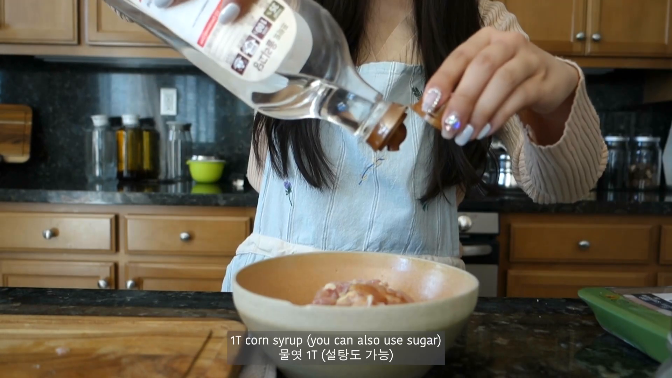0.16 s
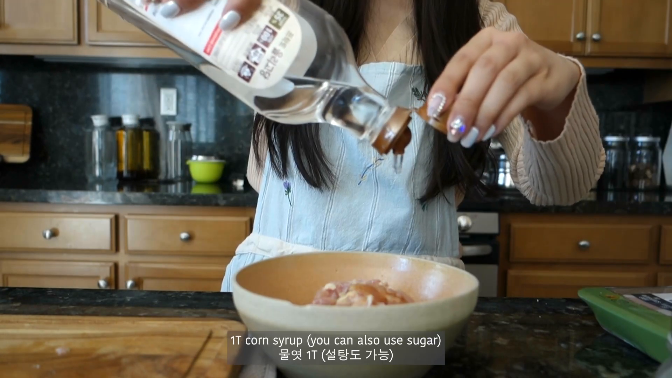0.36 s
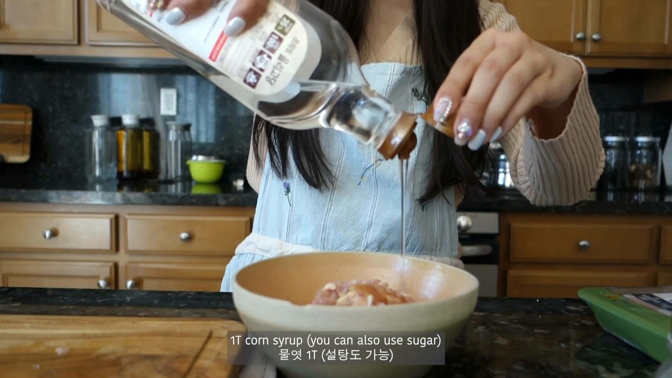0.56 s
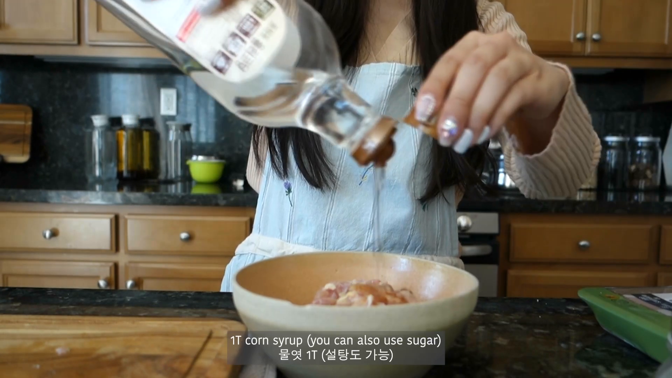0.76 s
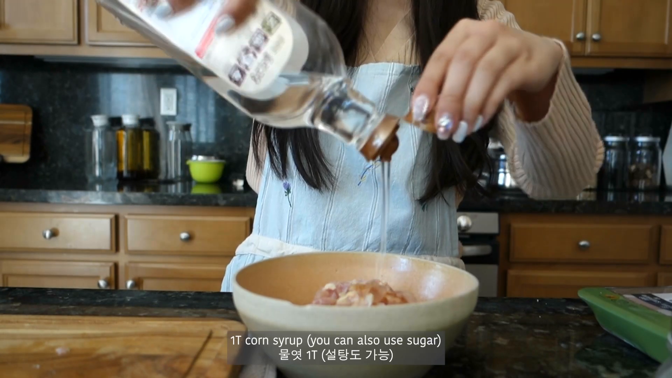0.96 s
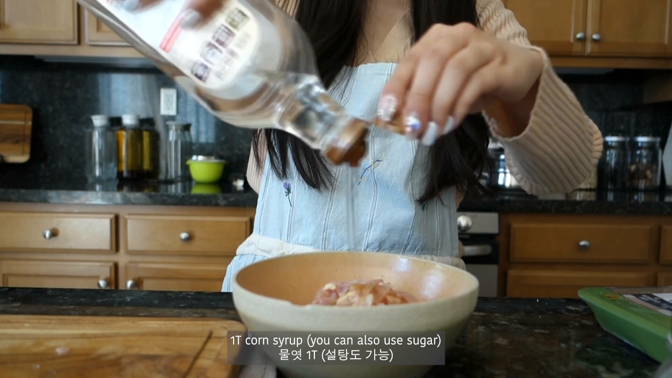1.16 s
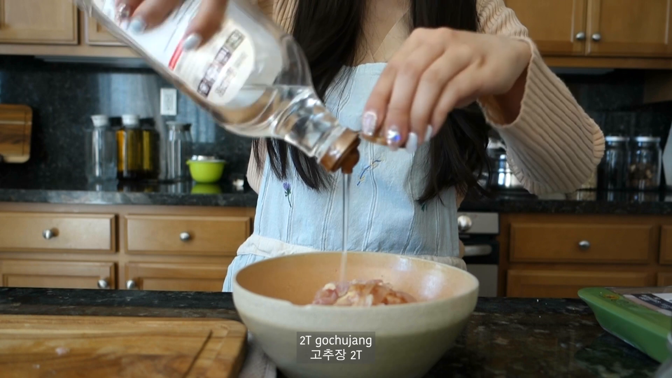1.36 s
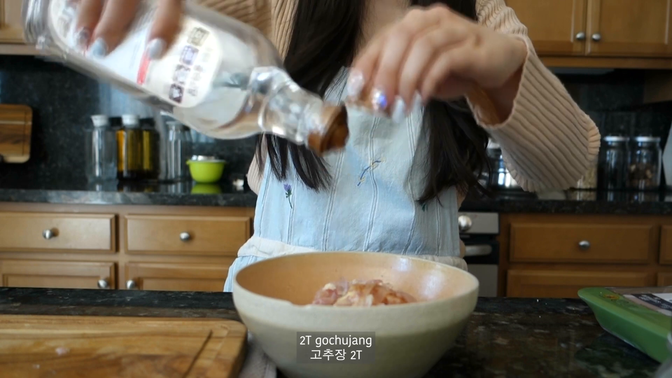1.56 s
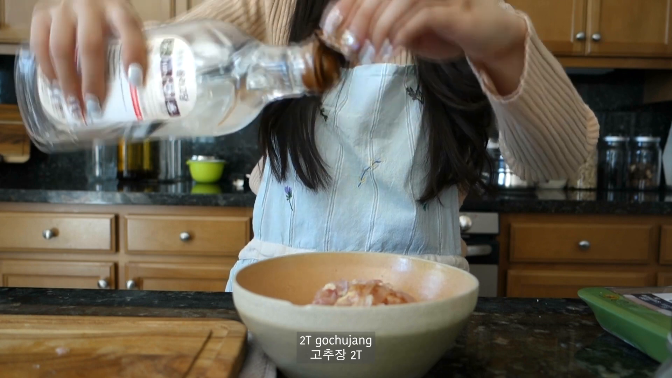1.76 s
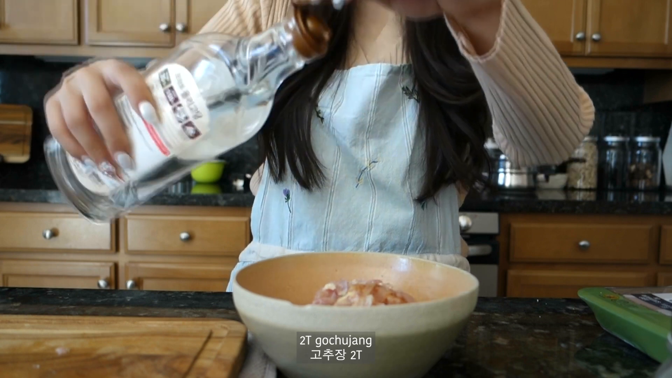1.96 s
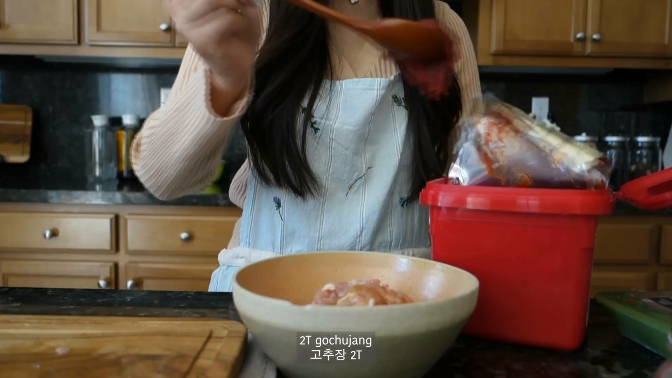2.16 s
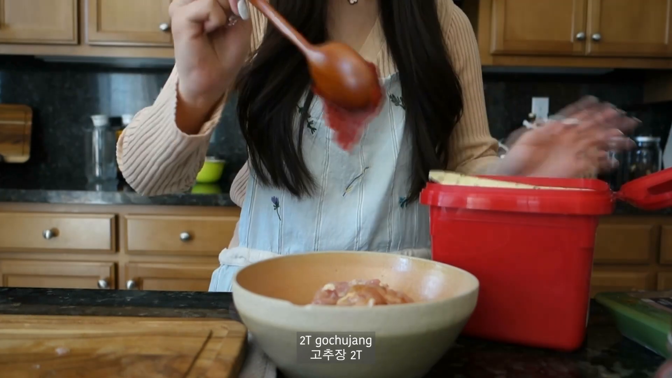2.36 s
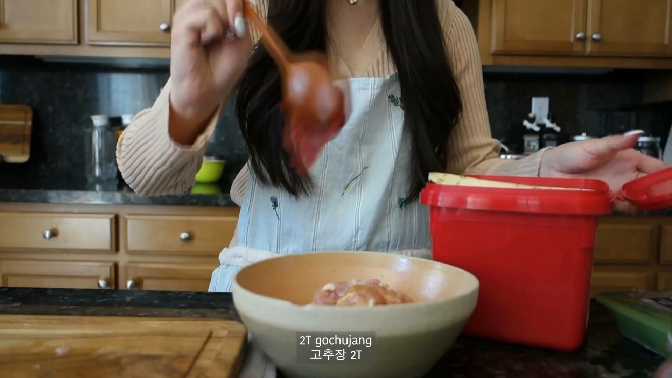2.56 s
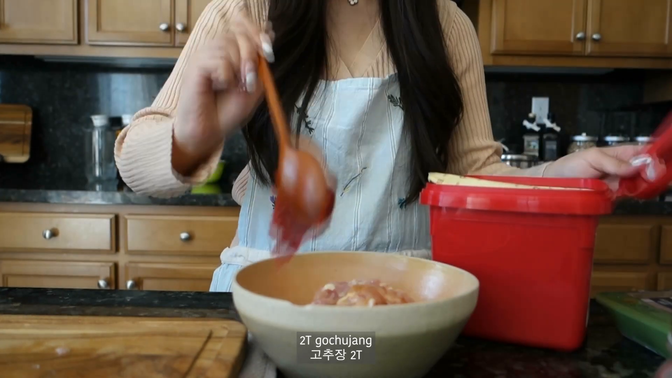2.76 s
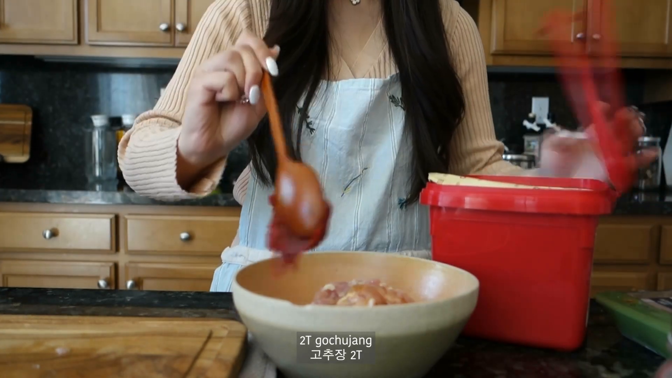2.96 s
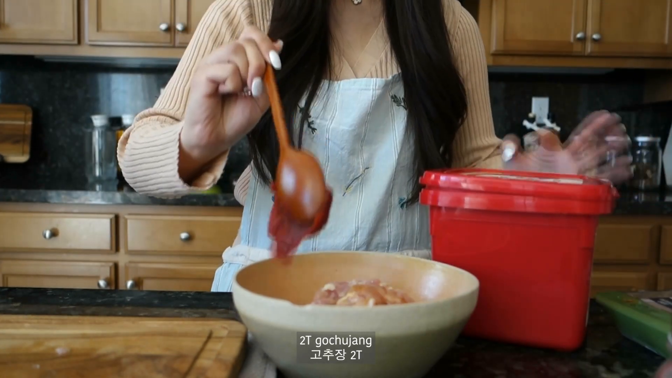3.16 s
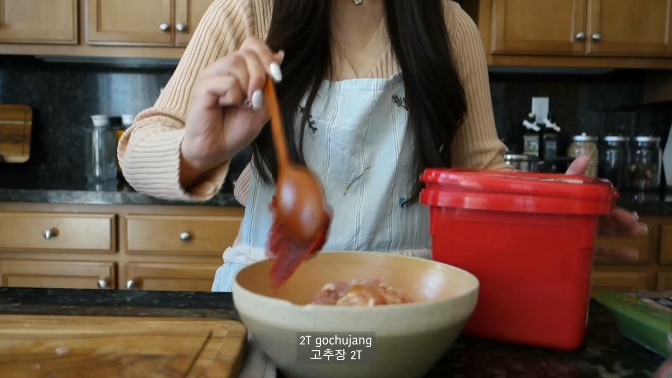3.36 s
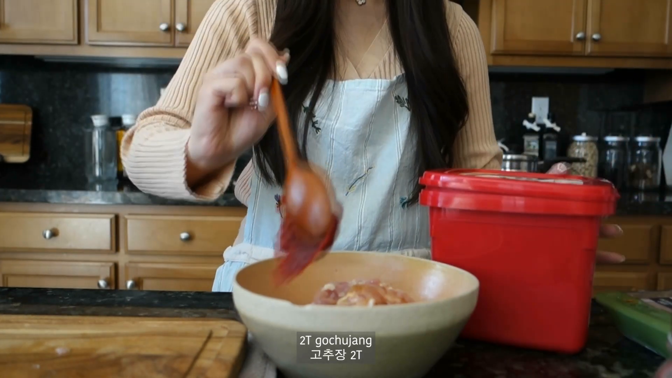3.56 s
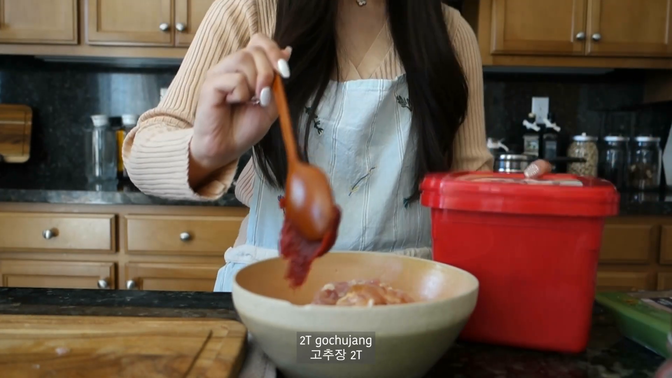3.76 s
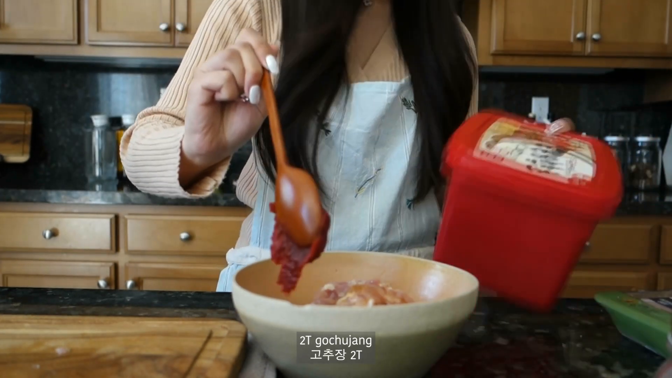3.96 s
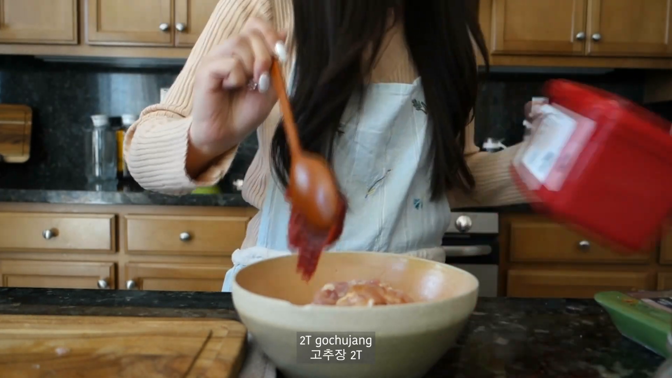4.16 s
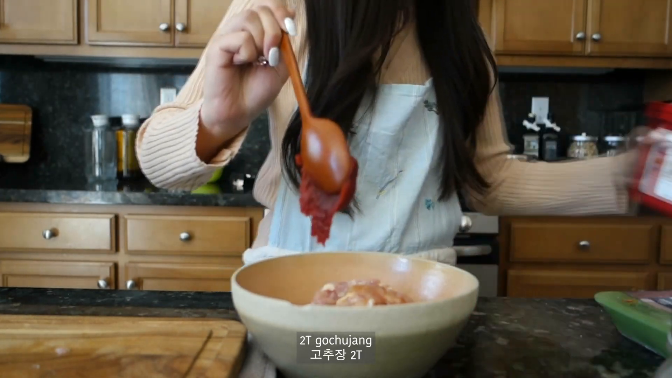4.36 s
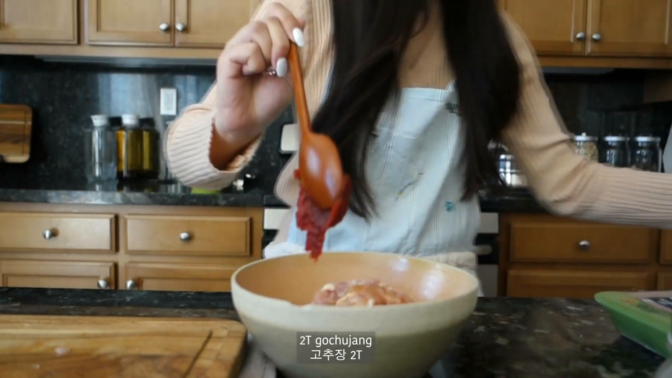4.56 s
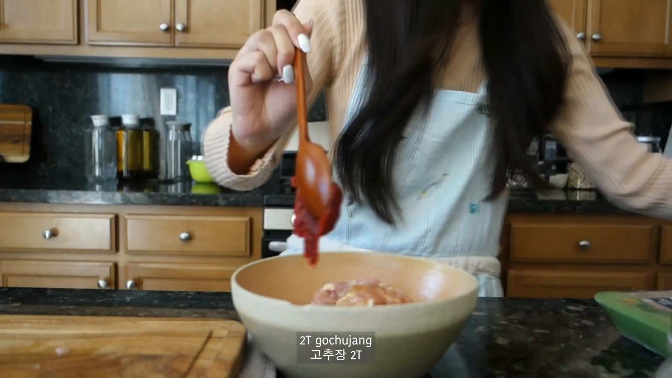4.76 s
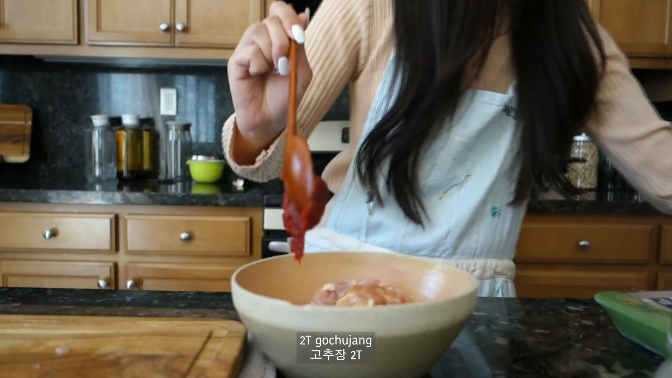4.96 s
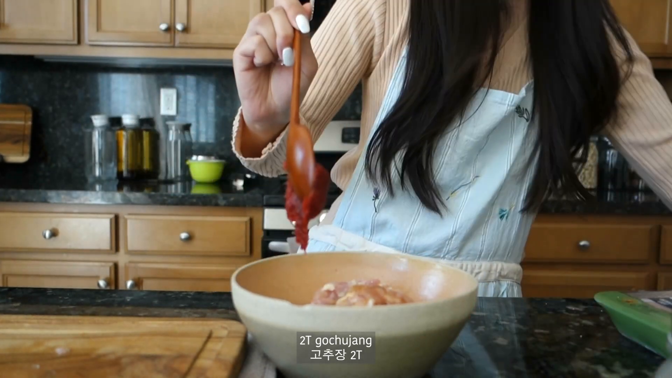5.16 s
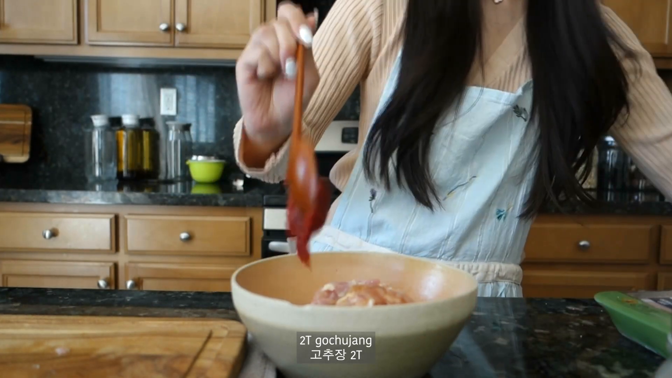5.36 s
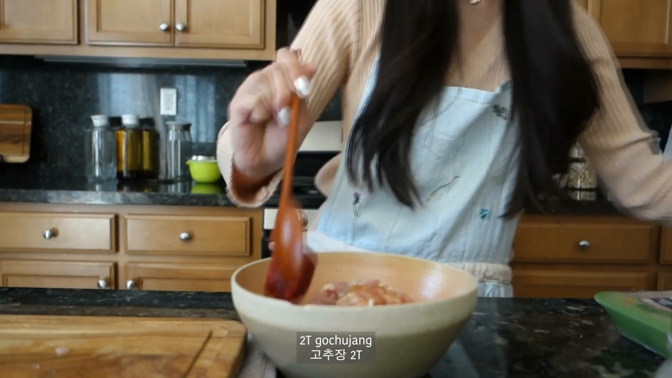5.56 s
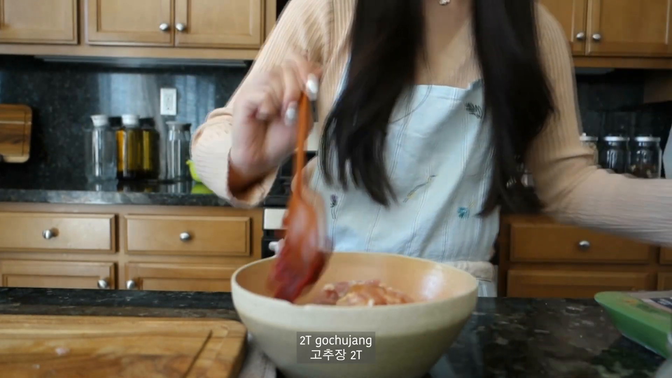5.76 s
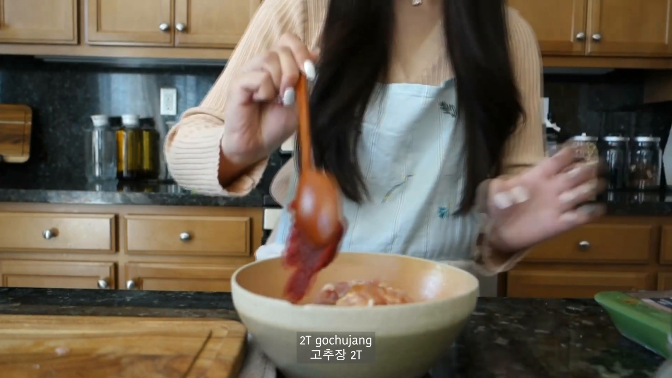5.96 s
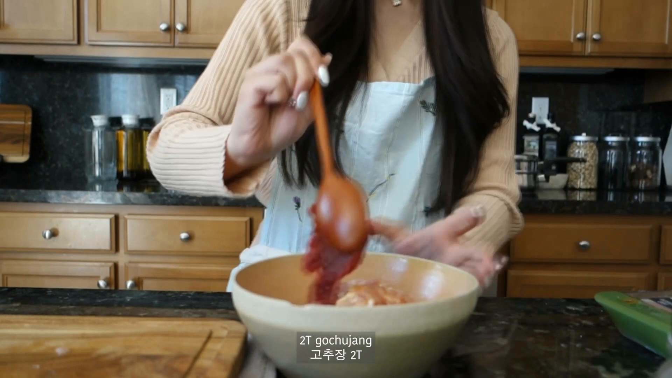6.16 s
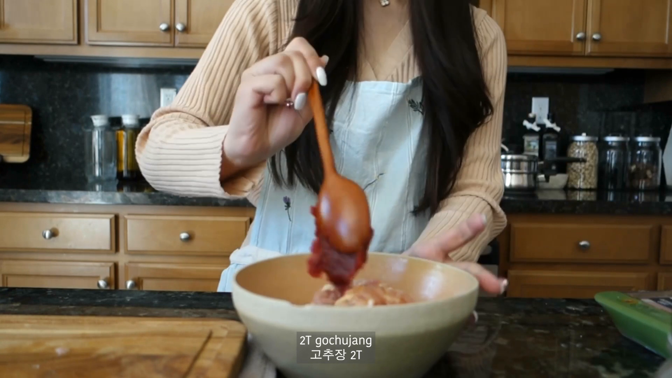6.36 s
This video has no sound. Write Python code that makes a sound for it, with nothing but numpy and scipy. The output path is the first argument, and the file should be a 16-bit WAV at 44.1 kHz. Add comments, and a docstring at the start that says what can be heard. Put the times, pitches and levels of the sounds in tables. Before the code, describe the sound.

Over a low fan hum, a plastic tub lid clicks, squeaks and knocks shut, then the tub bumps and scrapes heavily onto a shelf.

```python
"""A plastic tub handled at a kitchen counter, close to a stereo microphone and a little right of it.
Its lid clicks, chirps, knocks and whistles thinly as it is pressed home: noisy snaps, damped wavelets and
ringing modes. Put away on a shelf, the tub bumps heavily and slides: tiny slips excite rumble and squeal.
Paste lands in soft pats, a metal spoon handle rings faintly and fingers tick on a bottle; the kitchen echoes
the handling, and an appliance fan hums in the room: coloured noise through resonances."""
import sys
import numpy as np
from scipy import signal
from scipy.fft import rfft, irfft, next_fast_len
from scipy.io import wavfile

SR = 44100
rng = np.random.default_rng(int(sys.argv[2]) if len(sys.argv) > 2 else 0)


def unload_wav(signal):
    """Save mono or channel-first audio to the path in sys.argv[1] as 16-bit WAV at rate SR, clipped to [-1, 1]."""
    wavfile.write(
        sys.argv[1],
        SR,
        np.round(np.clip(np.atleast_2d(signal).T, -1, 1) * 32767).astype(np.int16),
    )


N = 282681
TIME = np.arange(N) / SR
BLOW_TIME = np.arange(SR // 4) / SR  # time axis of one short sound, s


def from_db(db):
    """Decibels to gain."""
    return 10 ** (np.asarray(db) / 20)


def rms_one(x):
    """Scale to unit rms."""
    return x / np.sqrt(np.mean(x ** 2) + 1e-20)


def at_hz(points, hz):
    """Read a table on a log-frequency axis."""
    table = np.array(points)
    return np.interp(np.log(hz + 1e-6), np.log(table[:, 0]), table[:, 1])


def in_time(rows):
    """Columns of a curve at every sample."""
    seconds, *columns = np.transpose(rows)
    return [np.interp(TIME, seconds, column) for column in columns]


def during(rows):
    """True between the first and the last point of a curve."""
    return (TIME > rows[0][0]) & (TIME < rows[-1][0])


def add(track, start, sound):
    """Lay a sound into a track at a time in seconds."""
    i = max(round(start * SR), 0)
    track[..., i:i + sound.shape[-1]] += sound[..., :N - i]


def band(x, low, high):
    """Causal band-pass."""
    sos = signal.butter(2, [low, high], "band", fs=SR, output="sos")
    return signal.sosfilt(sos, x + 1e-18)


def resonate(x, modes):
    """Parallel resonances of (Hz, width in Hz, dB), with alternating signs."""
    out = 0
    for k, (hz, width, db) in enumerate(modes):
        r = np.exp(-np.pi * width / SR)  # the wider the resonance, the faster it decays
        poles = [1, -2 * r * np.cos(2 * np.pi * hz / SR), r * r]
        gain = (-1) ** k * from_db(db) * (1 - r * r) / 2
        out = out + gain * signal.lfilter([1, 0, -1], poles, x + 1e-18)
    return out


def wavelet(hz, swell):
    """A heavily damped flexing: its envelope swells to 1 in swell seconds, then dies away."""
    envelope = (BLOW_TIME / swell * np.exp(1 - BLOW_TIME / swell)) ** 2
    return envelope * np.sin(2 * np.pi * hz * BLOW_TIME)


def at_level(x, db):
    """Give a short sound the energy of 12 ms at that level."""
    energy = np.sum(x ** 2, axis=-1, keepdims=True)
    return x * from_db(db) * np.sqrt(.012 * SR / (energy + 1e-20))


def lean(x, balance):
    """Tilt a sound between left and right, frequency by frequency."""
    size = next_fast_len(x.shape[-1] + 2048)
    db = at_hz(balance, np.fft.rfftfreq(size, 1 / SR))
    gains = from_db(np.array([db, -db]) / 2)
    return irfft(rfft(x, size) * gains, size)[:, :x.shape[-1]]


def left_late(x, count):
    """Sound from the right reaches the left microphone a few samples later."""
    return np.array([np.roll(x[0], count), x[1]])


def stereo_noise(spectrum, likeness, size):
    """Two channels of coloured noise, as alike at each frequency as the likeness table says."""
    padded = next_fast_len(size)
    hz = np.fft.rfftfreq(padded, 1 / SR)
    mid, side = rfft(rng.standard_normal((2, padded)))
    alike = np.clip(at_hz(likeness, hz), -1, 1)
    both = np.sqrt((1 + alike) / 2) * mid + np.sqrt((1 - alike) / 2) * side * [[1], [-1]]
    return irfft(both * from_db(at_hz(spectrum, hz)), padded)[:, :size]


# Colour of the room's rush. Each row: frequency in Hz, relative level per Hz in dB.
RUSH_SPECTRUM = [(20, -6), (50, -8.5), (72, -2), (140, -1.5), (260, -4), (420, -7.5), (550, -12),
                 (1000, -11.5), (1450, -18), (1900, -19.5), (2300, -23.5), (4000, -28), (12000, -30),
                 (14800, -28), (15700, -24.5)]
# Resonances of the fan. Each row: frequency in Hz, width in Hz, relative level in dB.
FAN_MODES = [(159, 2.8, 8), (275, 24, -20), (667, 74, -1), (805, 29, -4.5), (977, 33, -8.5), (1239, 88, -2),
             (1799, 69, -2.5)]
# How alike left and right hear the room. Each row: frequency in Hz, likeness from 0 to 1.
ROOM_TONE_LIKENESS = [(60, 0.98), (130, 0.96), (290, 0.79), (640, 0.56), (1410, 0.8), (3100, 0.033),
                      (15000, 0.058)]
# Balance of the room tone. Each row: frequency in Hz, left minus right in dB.
ROOM_TONE_BALANCE = [(200, 0), (1300, -2), (2400, -0.5), (4400, -4), (15000, -5)]
RUSH_DB, FAN_DB = -57, -63  # rms before the tilt between left and right


def room_tone():
    """A fan's dull rush and resonances over faint hiss; it reaches the left microphone a little sooner."""
    rush = rms_one(stereo_noise(RUSH_SPECTRUM, ROOM_TONE_LIKENESS, size=N))
    white = stereo_noise([(1, 0)], ROOM_TONE_LIKENESS, size=N)
    fan = rms_one(band(resonate(white, FAN_MODES), 80, 1670))
    left, right = lean(from_db(RUSH_DB) * rush + from_db(FAN_DB) * fan, ROOM_TONE_BALANCE)
    return np.array([left, np.roll(right, 4)])


# How long the kitchen rings. Each row: frequency in Hz, time to fall 60 dB in seconds.
ECHO_T60 = [(100, 1.9), (260, 0.54), (700, .5), (1840, 0.64), (4850, 0.45), (12800, 0.47)]
# Strength of the echoes. Each row: frequency in Hz, reverberant level against direct in dB.
ECHO_SPECTRUM = [(80, -12), (200, -5.5), (400, -6.5), (800, -4), (2000, -5.5), (4500, -2.5), (9000, -8.5),
                 (15000, -4.5)]
# How alike the echoes are left and right. Each row: frequency in Hz, likeness from 0 to 1.
ECHO_LIKENESS = [(100, 1), (300, 0.96), (600, 0.91), (1200, 0.75), (2400, 0.55), (4500, 0.033),
                 (15000, 0.13)]


def kitchen(x, first_echo_s=0.0056, build_s=0.00067):
    """Dense echoes off tiles and cupboards build up, then die away, lingering longest in the bass."""
    t = np.arange(SR * 3 // 4) / SR
    hz = np.fft.rfftfreq(len(t), 1 / SR)
    noise = rfft(stereo_noise(ECHO_SPECTRUM, ECHO_LIKENESS, size=len(t)))
    swell = 1 - np.exp(-np.maximum(t - first_echo_s, 0) / build_s)
    echoes = 0
    for centre, t60 in ECHO_T60:
        # overlapping bands, each fading at its own pace
        share = at_hz([(f, float(f == centre)) for f, _ in ECHO_T60], hz)
        fade = swell * from_db(-60 * t / t60)
        echoes = echoes + irfft(noise * share, len(t)) * fade / np.sqrt(np.sum(fade ** 2))
    return signal.fftconvolve(x[None], echoes, axes=1)[:, :N]


# Tiny ticks of the fingers. Each row: start in seconds, level in dB.
BOTTLE_TICKS = [(1.424, -69), (1.529, -77)]


def bottle(tick_t60=.03):
    """Fingers tick faintly on a bottle: short decaying bursts of bright noise."""
    out = np.zeros(N)
    for start, db in BOTTLE_TICKS:
        burst = rng.standard_normal(len(BLOW_TIME)) * from_db(-60 * BLOW_TIME / tick_t60)
        add(out, start, at_level(band(burst, 1800, 14000), db))
    return out


# paste is worked off the spoon in small uneven pats: seconds, seconds, dB, Hz
PASTE_START_S, PASTE_GAP_S, PASTE_DB, PASTE_HZ = 6.115, .034, -44.5, 159


def paste_pats(count=5):
    """Pats at uneven times, strengths and pitches: (s, dB, Hz)."""
    pats = []
    for k, (late, harder, higher) in enumerate(rng.standard_normal((count, 3))):
        start = PASTE_START_S + PASTE_GAP_S * (k + 0.191 * late)
        pats.append((start, PASTE_DB + harder, PASTE_HZ * 2 ** (0.18 * higher)))
    return pats


# Soft pats of paste and hands. Each row: start in seconds, level in dB, pitch in Hz.
DABS = [(.1, -49, 210), (2.641, -46, 345), (3.009, -45.5, 125), (6.016, -40.5, 270)]
# The faint ring of a metal spoon handle. Each row: frequency in Hz, level in dB.
HANDLE_MODES = [(2789, -68), (5943, -83), (7698, -71), (11838, -79)]
HANDLE_S, HANDLE_WIDTH_S = 6.298, 0.022  # middle and spread of the swell


def spoon(dab_cycles=1.2):
    """Paste lands with soft damped pats; a metal spoon handle rings faintly in a brief swell of pure tones."""
    out = np.zeros(N)
    for start, db, hz in DABS + paste_pats():
        add(out, start, from_db(db) * wavelet(hz, dab_cycles / hz))
    swell = np.exp(-.5 * ((TIME - HANDLE_S) / HANDLE_WIDTH_S) ** 2)
    tones = sum(from_db(db) * np.sin(2 * np.pi * hz * TIME) for hz, db in HANDLE_MODES)
    return out + swell * tones


# Short shoves of the tub. Each row: start in seconds, length in seconds, rumble in dB, squeal in dB.
SHOVES = [(5.021, 0.038, -31, -36), (5.112, 0.093, -33, -39.5), (5.267, 0.04, -28, -54),
          (5.334, 0.016, -33.5, -38)]
# The shelf under the slide. Each row: frequency in Hz, width in Hz, relative level in dB.
RUMBLE_MODES = [(68, 16, -12), (123, 24, 0.5), (230, 38, 2), (290, 58, 2.5), (440, 154, -1)]
# The squealing contact. Each row: frequency in Hz, width in Hz, relative level in dB.
SQUEAL_MODES = [(780, 400, -6), (846, 32, 2), (1058, 18, 7.5), (1133, 35, 3), (1290, 66, 1.5),
                (1458, 30, 6.5), (1580, 170, -14), (2040, 170, -9.5), (2540, 140, -12.5)]
# each shove breaks away with a louder squeal that soon settles, then dies out
SHOVE_ATTACK_S, RUMBLE_RELEASE_DB_PER_S, SQUEAL_RELEASE_DB_PER_S = 0.0017, 200, 157
BREAKAWAY_DB, BREAKAWAY_S = 6.5, 0.017


def slide(slips_per_s=450):
    """The tub is pushed along: tiny random slips make the shelf rumble and the contact squeal."""
    rumbling, squealing = 0, 0
    for start, length, rumble_db, squeal_db in SHOVES:
        age = np.maximum(TIME - start, 0)
        after = np.maximum(TIME - start - length, 0)
        push = 1 - np.exp(-age / SHOVE_ATTACK_S)
        rumble_now_db = rumble_db - RUMBLE_RELEASE_DB_PER_S * after
        breakaway_db = BREAKAWAY_DB * np.exp(-age / BREAKAWAY_S)
        squeal_now_db = squeal_db + breakaway_db - SQUEAL_RELEASE_DB_PER_S * after
        rumbling = np.maximum(rumbling, push * from_db(rumble_now_db))
        squealing = np.maximum(squealing, push * from_db(squeal_now_db))
    slips = (rng.random(N) < slips_per_s / SR) * rng.standard_normal(N)
    rumble = rms_one(band(resonate(slips, RUMBLE_MODES), 56, 580))
    squeal = rms_one(band(resonate(slips, SQUEAL_MODES), 400, 2530))
    return rumbling * rumble + squealing * squeal


def contact(start, thump_db, knock_db, knock_hz, snap_db, brightness_db, rattle_t60, crack_db=0):
    """One contact; brightness tilts its snap from the clack through the crack to the tick."""
    clack_db, tick_db = snap_db - brightness_db, snap_db + brightness_db
    return start, thump_db, knock_db, knock_hz, clack_db, snap_db + crack_db, tick_db, rattle_t60


WALL_Q, WALL_DB = 17, -1.5  # local wall resonances: sharpness, and dB against the broad colour


def touch_snap(colour, levels_db, rattle_t60, snap_t60, rattle_db, grain_db):
    """Grainy noise and a plain click excite the touched wall: row 0 for the microphone, row 1 the room."""
    size = len(BLOW_TIME)
    noise = rng.standard_normal(size)
    grain = np.repeat(rng.standard_normal(size), 16)[:size]  # roughness held for 16 samples
    decay = from_db(-60 * BLOW_TIME / snap_t60) + from_db(rattle_db - 60 * BLOW_TIME / rattle_t60)
    force = noise * from_db(grain_db * grain) * decay
    # where it is touched the wall has a few sharper resonances of its own
    local_hz = np.geomspace(620, 2900, 7) * 2 ** rng.uniform(-.2, .2, 7)
    local_db = at_hz([(hz, db) for hz, width, db in colour], local_hz) + WALL_DB
    local = zip(local_hz, local_hz / WALL_Q, local_db)
    # summed over all directions the snap's spectrum is smooth, so the room hears a plain click
    touch = np.array([force, BLOW_TIME == 0])
    bright = resonate(touch, colour) + resonate(touch, local)
    clack_db, crack_db, tick_db = levels_db
    clack = at_level(band(bright, 550, 1600), clack_db)
    crack = at_level(band(bright, 1600, 4000), crack_db)
    tick = at_level(band(bright, 4000, 17000), tick_db)
    return clack - crack + tick  # neighbouring bands meet in opposite phase, hence the minus


def ring(blows, modes, ring_db):
    """The body rings on: each mode is a decaying sine started by its own blows."""
    out = 0
    for k, (hz, db, t60) in enumerate(modes):
        r, w = from_db(-60 / (t60 * SR)), 2 * np.pi * hz / SR
        poles = [1, -2 * r * np.cos(w), r * r]
        sine = signal.lfilter([0, np.sin(w)], poles, blows[k] + 1e-18)
        out = out + (-1) ** k * from_db(db + ring_db) * sine
    return out


def contacts(hits, modes, colour, thump_hz, thump_swell, knock_cycles, snap_t60, rattle_db, grain_db,
             ring_db, bright_db, spread_db, focus_db):
    """Each hit snaps and rattles, knocks the wall, thumps the support and leaves the body ringing.
    Returns what goes straight to the microphone and what spreads into the room."""
    out, blows = np.zeros((2, N)), np.zeros((len(modes), N))
    mode_hz = np.array(modes)[:, :1]
    for start, thump_db, knock_db, knock_hz, clack_db, crack_db, tick_db, rattle_t60 in hits:
        levels_db = clack_db, crack_db, tick_db
        snap = touch_snap(colour, levels_db, rattle_t60, snap_t60, rattle_db, grain_db)
        add(out, start, from_db([[bright_db], [spread_db]]) * snap)
        add(out, start, at_level(wavelet(knock_hz, knock_cycles / knock_hz), knock_db))
        add(out, start, at_level(wavelet(thump_hz, thump_swell), thump_db))
        # a blow wakes mostly the modes near its own pitch: focus_db less for each octave away
        for db, hz in ((knock_db, knock_hz), (thump_db, thump_hz)):
            octaves_away = np.abs(np.log2(mode_hz / hz))
            add(blows, start, from_db(db - focus_db * octaves_away))
    return out + ring(blows, modes, ring_db)


# The tub bumps on the shelf. Each row: start in seconds, knock in dB, knock pitch in Hz, thump in dB,
# snap in dB before the shelf's bright_db or spread_db, brightness in dB per band.
SHELF_BUMPS = [(4.441, -51, 694, -77, -76, -3), (4.7667, -31, 230, -38.5, -67, -19),
               (4.9346, -22.5, 250, -27.5, -55, -17), (5.0253, -19, 382, -46, -37, -7),
               (5.157, -34, 283, -36.5, -59, 4), (5.22, -21, 292, -30, -43.5, -9.5),
               (5.2677, -20.5, 308, -29.5, -34, -13), (5.281, -30.5, 290, -32, -40.5, -3),
               (5.318, -23.5, 217, -50, -67, 0), (5.356, -33.5, 306, -60, -54, -4),
               (5.4, -36.5, 230, -60, -59, 2.5), (5.493, -70, 480, -63, -56, 4)]
SHELF_RATTLE_T60_S = 0.087


def shelf_bumps():
    """Each heavy bump of the tub on the shelf, quick rebounds included, is its own row."""
    return [contact(start, thump_db, knock_db, hz, snap_db, brightness_db, SHELF_RATTLE_T60_S)
            for start, knock_db, hz, thump_db, snap_db, brightness_db in SHELF_BUMPS]


# What the shelf rings with. Each row: frequency in Hz, relative level in dB, time to fall 60 dB in seconds.
SHELF_MODES = [(69.7, -11, 0.84), (120.2, -19, 0.35), (125, -10, 0.17), (206.3, -4, 0.15),
               (267.7, -12.5, 0.57), (331.4, -11, 0.38), (366.8, -11, 0.34), (421, -13, 0.22),
               (507.6, -16.5, 0.36), (604, -6, 0.025)]
# Colour of the shelf's snaps. Each row: frequency in Hz, width in Hz, relative level in dB.
SHELF_COLOUR = [(550, 200, 12), (843, 286, 11.5), (960, 160, 13), (1480, 110, 5.5), (1900, 1100, -1),
                (2900, 900, -13), (4840, 5000, -32), (11000, 22000, -6.5)]


def shelf():
    """Heavy, dull bumps of the tub on a shelf: slow thumps, knocks, snaps and ringing low modes."""
    return contacts(shelf_bumps(), SHELF_MODES, SHELF_COLOUR, thump_hz=124.6, thump_swell=0.023,
                    knock_cycles=0.68, snap_t60=0.012, rattle_db=14, grain_db=7.0, ring_db=3.5,
                    bright_db=-8.5, spread_db=1.5, focus_db=8.5)


# Air past the lid as it is pressed. Each row: time in seconds, lower tone in Hz, upper tone in Hz,
# level of the lower tone in dB; the pitches waver around these values.
WHISTLE = [(3.26, 10950, 12500, -80), (3.29, 11400, 13000, -75), (3.34, 11700, 13400, -73),
           (3.37, 11200, 12450, -62), (3.4, 11480, 12500, -75.5), (3.45, 11250, 12800, -70),
           (3.5, 11400, 13150, -64), (3.54, 10950, 12700, -71)]


def whistle(waver_hz=110, upper_db=-3):
    """Air whistles thinly past the lid: two gliding tones share one random waver in pitch."""
    lower_hz, upper_hz, db = in_time(WHISTLE)
    slow = signal.butter(2, 150, fs=SR, output="sos")
    waver = rms_one(signal.sosfilt(slow, rng.standard_normal(N)))
    pitches = np.array([lower_hz, upper_hz]) + waver_hz * waver
    lower, upper = np.sin(2 * np.pi * np.cumsum(pitches, axis=1) / SR)
    return during(WHISTLE) * from_db(db) * (lower + from_db(upper_db) * upper)


# Short squeaks of the lid's rim. Each row: start in seconds, level in dB, pitch in Hz, swell in seconds.
SQUEAKS = [(2.2005, -15, 2620, 0.00063), (2.2029, -18.5, 2060, 0.00047), (2.2093, -30, 2000, 0.0008),
           (3.1435, -17, 2180, 0.0011), (3.838, -23.5, 2200, 0.00055)]


def squeaks():
    """The lid's rim slips and chirps for a few milliseconds."""
    out = np.zeros(N)
    for start, db, hz, swell in SQUEAKS:
        add(out, start, from_db(db) * wavelet(hz, swell))
    return out


# The lid's rim catches and lets go. Each row: start in seconds, snap in dB before the tub's bright_db or
# spread_db, brightness in dB per band, time for the rattle to fall 60 dB in seconds.
RIM_CLICKS = [(2.1053, -41, -6.5, 0.04), (2.1193, -39.5, 3, 0.0068), (2.1275, -45.5, 6, 0.011),
              (2.1547, -43.5, 0, 0.037), (2.1773, -40.5, -2.5, .02), (2.186, -42.5, -7.5, 0.23),
              (2.2527, -49, 0.5, 0.018), (2.274, -43, 6, 0.02), (2.298, -45.5, 10.5, 0.13),
              (2.7732, -56, 3, 0.017), (3.661, -60.5, -3.5, 0.18), (3.7445, -52, -8.5, 0.045),
              (3.836, -39.5, 0.5, 0.029)]
# every click rebounds once, and shakes the wall and the counter a little (dB against the snap)
REBOUND_S, REBOUND_LOSS_DB = 0.0054, 8.5
CLICK_KNOCK_DB, CLICK_KNOCK_HZ, CLICK_THUMP_DB = -5, 564, -9.5
CLICK_CRACK_DB = 4  # the stiff rim favours the crack


def rim_clicks():
    """Each click of the rim and its quick, weaker rebound."""
    hits = []
    for start, snap_db, brightness_db, rattle_t60 in RIM_CLICKS:
        for k in range(2):
            db = snap_db - k * REBOUND_LOSS_DB
            hits.append(contact(start + k * REBOUND_S, db + CLICK_THUMP_DB, db + CLICK_KNOCK_DB,
                                CLICK_KNOCK_HZ, db, brightness_db, rattle_t60, CLICK_CRACK_DB))
    return hits


# The tub and its lid are knocked. Each row: start in seconds, knock in dB, knock pitch in Hz, snap in dB
# before the tub's bright_db or spread_db, brightness in dB per band, knock's loss per bounce in dB.
TUB_KNOCKS = [(2.143, -52, 510, -51, 0, 17), (2.3017, -32.5, 458, -35.5, -3, 7),
              (2.338, -42.5, 500, -63, -6, 12), (2.421, -44, 570, -65.5, -21, 20),
              (2.7651, -39.5, 547, -41.5, 4.5, 19), (3.0693, -34.5, 407, -39, -2.5, 5),
              (3.123, -33, 440, -43.5, -2, 9), (3.1443, -19, 385, -27, -4.5, 8.5),
              (3.3693, -34, 370, -41, -4.5, 6), (3.518, -39.5, 230, -60, -5, 18),
              (3.531, -35, 310, -58, -10.5, 15), (3.646, -40, 342, -66, -5, 10),
              (3.706, -35, 328, -60, -7, 11), (3.763, -29.5, 324, -53.5, -10, 15),
              (3.815, -27.5, 457, -47.5, -3, 7)]
BOUNCE_S, BOUNCE_SNAP_LOSS_DB = .0163, 8.5
KNOCK_THUMP_DB, KNOCK_RATTLE_T60_S = -7.5, 0.036  # thump against knock; rattle decay
# only the deeper knocks thump the counter; higher ones stay in the lid
THUMP_BELOW_HZ, THUMP_FALL_DB_PER_OCTAVE = 436, 61


def tub_knocks():
    """Each knock and its two weaker bounces; the thump loses twice as many dB per bounce as the knock."""
    hits = []
    for start, knock_db, hz, snap_db, brightness_db, loss_db in TUB_KNOCKS:
        octaves_above = max(np.log2(hz / THUMP_BELOW_HZ), 0)
        thump_db = knock_db + KNOCK_THUMP_DB - THUMP_FALL_DB_PER_OCTAVE * octaves_above
        for k in range(3):
            hits.append(contact(start + k * BOUNCE_S, thump_db - 2 * k * loss_db, knock_db - k * loss_db, hz,
                                snap_db - k * BOUNCE_SNAP_LOSS_DB, brightness_db, KNOCK_RATTLE_T60_S))
    return hits


# pressed home, the lid judders down in a short run of dull knocks that grow stronger
JUDDER_START_S, JUDDER_GAP_S = 3.451, .0175
JUDDER_DB, JUDDER_RISE_DB, JUDDER_HZ = -44, 3.5, 370  # first knock, rise per knock, pitch
JUDDER_SNAP_DB, JUDDER_BRIGHTNESS_DB = -71, -11  # first snap before the tub's bright_db or spread_db


def lid_judder(count=3):
    """The lid slips into its seat step by step."""
    hits = []
    for k in range(count):
        db = JUDDER_DB + k * JUDDER_RISE_DB
        snap_db = JUDDER_SNAP_DB + k * JUDDER_RISE_DB
        hits.append(contact(JUDDER_START_S + k * JUDDER_GAP_S, db + KNOCK_THUMP_DB, db, JUDDER_HZ,
                            snap_db, JUDDER_BRIGHTNESS_DB, KNOCK_RATTLE_T60_S))
    return hits


# What the tub rings with. Each row: frequency in Hz, relative level in dB, time to fall 60 dB in seconds.
TUB_MODES = [(63.8, -12, 0.26), (150, -26, 0.12), (181, -8, 0.13), (212, -7, 0.086), (269, -16.5, 0.71),
             (315.7, -20, 0.81), (365, -21, 0.22), (359, -12.5, 0.06), (486, -59, 0.57), (499, -14, 0.27),
             (575, -19, 0.21), (897, -17, 0.24)]
# Colour of the tub's snaps. Each row: frequency in Hz, width in Hz, relative level in dB.
TUB_COLOUR = [(804, 1390, 0), (1200, 1470, 1.5), (1790, 1260, -2.5), (2770, 596, 2), (4070, 13500, -3.5),
              (6600, 1900, 2.5), (12500, 7900, -9.5)]


def tub():
    """Thin plastic snaps and knocks: rim clicks, bouncing knocks and the lid juddering into its seat."""
    hits = rim_clicks() + tub_knocks() + lid_judder()
    return contacts(hits, TUB_MODES, TUB_COLOUR, thump_hz=130, thump_swell=0.013,
                    knock_cycles=0.97, snap_t60=0.0056, rattle_db=12, grain_db=2.8, ring_db=-2.5,
                    bright_db=-4.5, spread_db=-3.5, focus_db=3.5)


# Balance of the handling, right of the microphone. Each row: frequency in Hz, left minus right in dB.
HANDLING_BALANCE = [(100, 0.5), (300, -0.2), (700, -4.5), (1300, -3), (2600, -6), (5000, -6), (9000, -11.5),
                    (15000, -9.5)]
# Balance of the echoes. Each row: frequency in Hz, left minus right in dB.
ECHO_BALANCE = [(200, 0), (1000, -1), (2500, -3.5), (5000, -11), (15000, -5)]
# gain with which each source reaches the room; the tub's also serves spoon and bottle, the shelf's the slide
TUB_WET_DB, SQUEAK_WET_DB, SHELF_WET_DB = 0.2, -7, -2.5


def scene():
    """Handling from the right, its echoes and the room tone; counter and shelf have echoes of their own."""
    near, near_spread = tub() + spoon() + bottle()
    far, far_spread = shelf() + slide()
    chirps = squeaks()
    echoes = kitchen(from_db(TUB_WET_DB) * near_spread + from_db(SQUEAK_WET_DB) * chirps)
    echoes += kitchen(from_db(SHELF_WET_DB) * far_spread)
    counter = left_late(lean(near + chirps + whistle(), HANDLING_BALANCE), count=1)
    put_away = left_late(lean(far, HANDLING_BALANCE), count=3)
    return counter + put_away + lean(echoes, ECHO_BALANCE) + room_tone()


LOW_CUT_HZ, CUTOFF_HZ = 20, 15900


def record(dry):
    """The microphone sheds the deepest bass; the top is cut steeply."""
    low_cut = signal.butter(2, LOW_CUT_HZ, "high", fs=SR, output="sos")
    top_cut = signal.ellip(10, .1, 80, CUTOFF_HZ, fs=SR, output="sos")
    return signal.sosfilt(top_cut, signal.sosfilt(low_cut, dry))


dry = scene()
out = record(dry)
unload_wav(out)
```